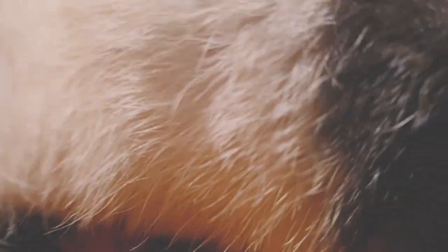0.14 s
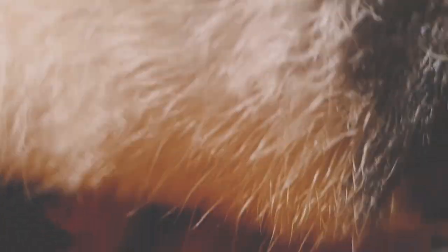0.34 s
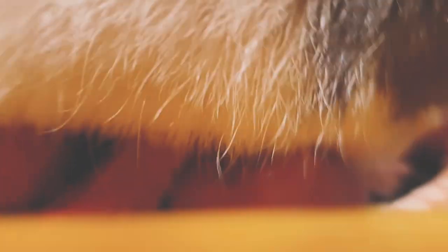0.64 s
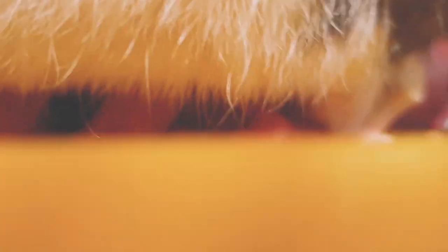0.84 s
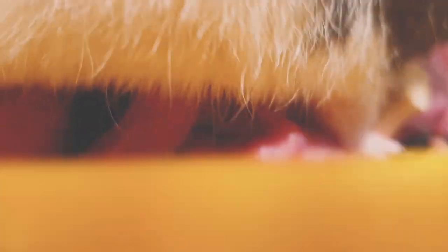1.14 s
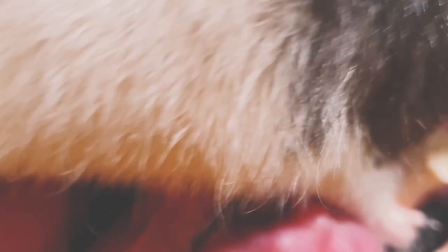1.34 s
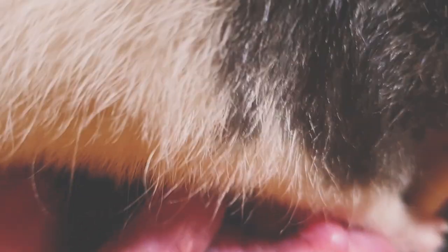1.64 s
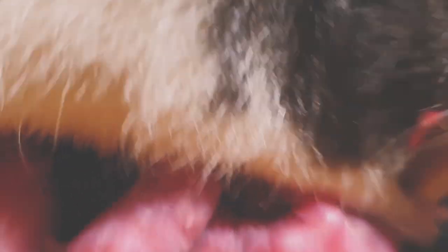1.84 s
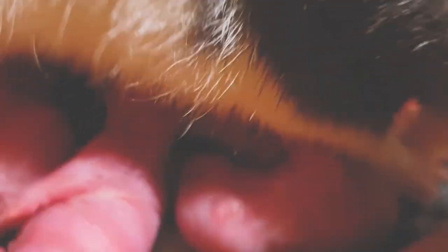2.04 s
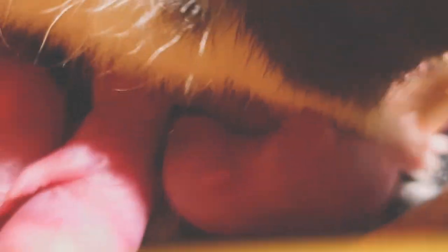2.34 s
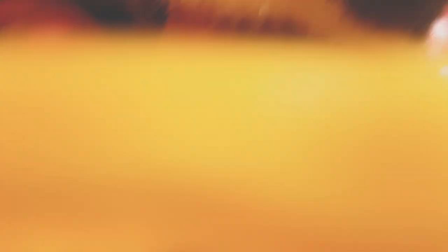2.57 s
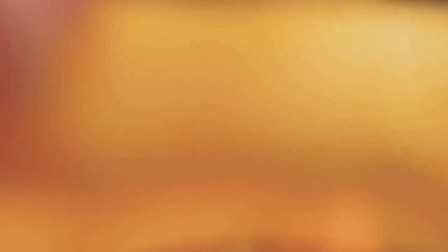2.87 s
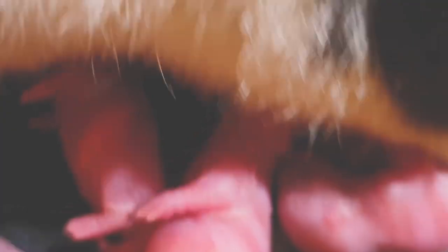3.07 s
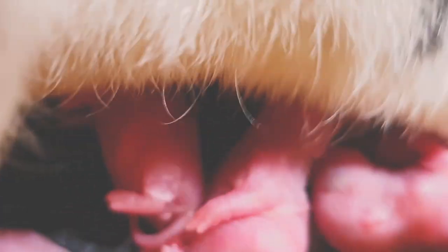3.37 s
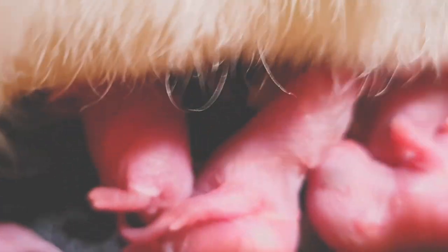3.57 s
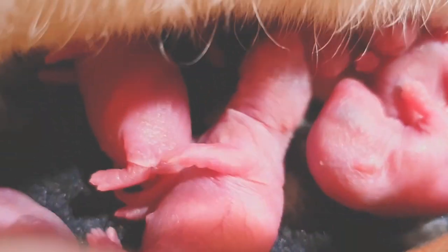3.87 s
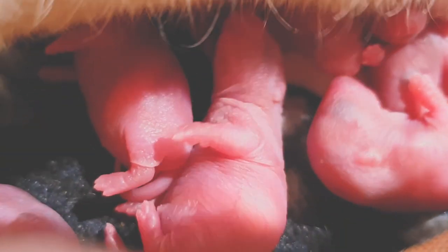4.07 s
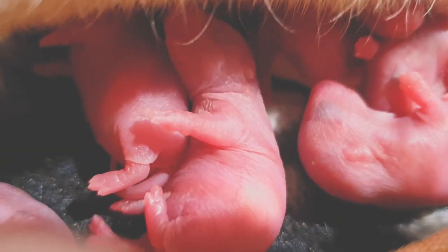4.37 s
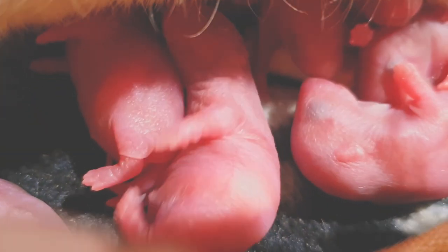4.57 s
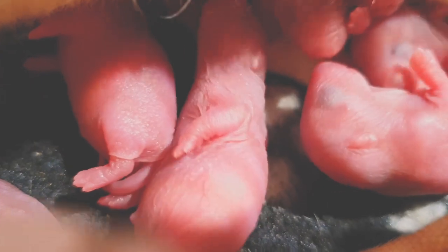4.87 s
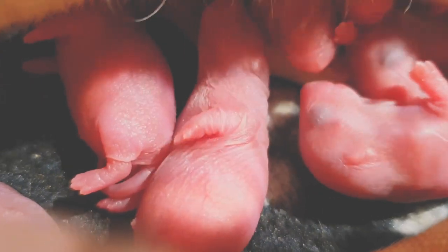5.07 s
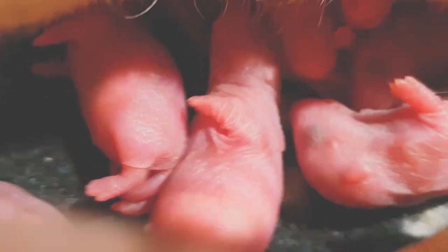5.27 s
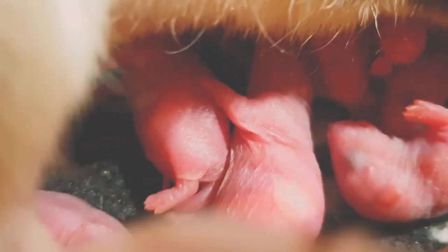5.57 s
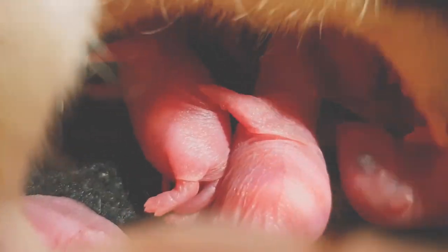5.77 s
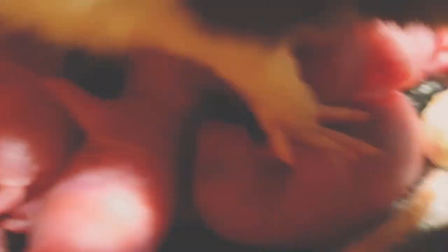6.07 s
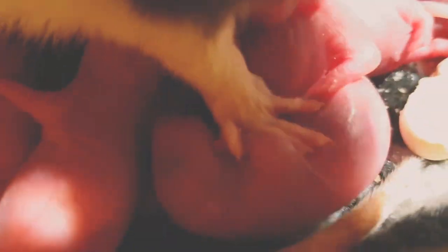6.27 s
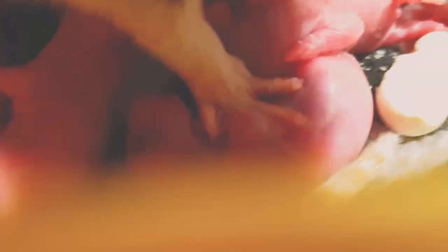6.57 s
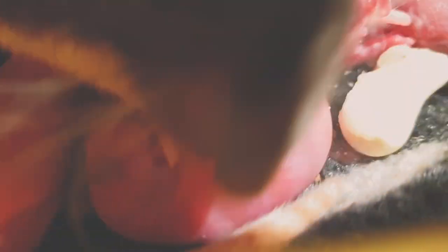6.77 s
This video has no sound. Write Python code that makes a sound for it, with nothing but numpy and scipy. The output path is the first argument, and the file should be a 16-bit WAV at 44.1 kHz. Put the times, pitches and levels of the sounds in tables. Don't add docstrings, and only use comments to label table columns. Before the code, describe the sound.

Newborn rat pups squeal in three ragged bouts of shrill, cracking whistles, with wet smacks, tiny clicks and fur rustling close to the microphone.

```python
import sys
import numpy as np
from scipy import signal
from scipy.fft import rfft, irfft, next_fast_len
from scipy.io import wavfile
from scipy.ndimage import uniform_filter1d

SR = 44100
rng = np.random.default_rng(int(sys.argv[2]) if len(sys.argv) > 2 else 0)


def dump_mix(stems):
    frames = np.atleast_2d(stems).T
    limited = np.clip(frames, -1, 1)
    pcm = np.round(limited * 32767).astype(np.int16)
    wavfile.write(sys.argv[1], SR, pcm)


def convert_level_to_amplitude(level_db):
    exponent = np.asarray(level_db, float) / 20
    return 10 ** exponent


N = 304731
TOP_HZ = 15750


def unit(x):
    return x / np.sqrt(np.mean(x ** 2) + 1e-20)


def along(points, hz):
    f, v = np.transpose(points)
    return np.interp(np.log(hz + 1), np.log(f + 1), v)


def curves(rows, t):
    s, *cols = np.transpose(rows)
    return [np.interp(t, s, c) for c in cols]


def wobble(rate, size):
    knots = size * rate / SR + 1
    values = rng.standard_normal(int(np.ceil(knots)))
    return np.interp(np.arange(size) * rate / SR, np.arange(knots), values)


def filtered(x, response):
    m = next_fast_len(x.shape[-1] + 4096)
    return irfft(rfft(x, m) * response(np.fft.rfftfreq(m, 1 / SR)), m)[..., :x.shape[-1]]


def modes(table):
    def response(f):
        total = 0
        for k, (centre, width, db) in enumerate(table):
            damping = 1j * f * width
            total = total + (-1) ** k * convert_level_to_amplitude(db) * damping / (centre * centre - f * f + damping + 1e-9)
        return total
    return response


def swells(rows, rest_db):
    t = np.arange(0, N + 128, 128) / SR
    s, length, *levels = np.transpose(rows)[..., None]
    rise_db = 479 * np.clip(s - t, 0, None)
    fade_db = 260 * np.clip(t - s - length, 0, None)
    held = [np.maximum((db - rise_db - fade_db).max(0), rest) for db, rest in zip(levels, rest_db)]
    return [np.interp(np.arange(N) / SR, t, db) for db in held]


# freq_hz, gain_db
RIGHT = [(300, -25), (1500, -11.5), (3200, -10), (5000, 0.5), (6500, -4.5), (10000, -15), (13000, -15),
         (16000, -16.5)]


def ports(x, right_db, lag_ms):
    def far(hz):
        late = np.exp(-(np.log((hz + 1) / 5600) / 0.35) ** 2)
        return -convert_level_to_amplitude(along(RIGHT, hz) + right_db) * np.exp(-2j * np.pi * hz * lag_ms / 1000 * late)
    return np.array([x, filtered(x, far)])


# centre_hz, width_hz, gain_db
HOLLOWS = [(2350, 260, -15), (3980, 230, -7), (8600, 450, -10)]


def hollow(hz):
    return convert_level_to_amplitude(sum(db * np.exp(-((hz - centre) / width) ** 2) for centre, width, db in HOLLOWS))


# freq_hz, correlation (-1 to 1)
ALIKE = [(60, 0.079), (200, -0.086), (600, -0.14), (1400, -0.45), (15000, -0.22)]
# freq_hz, difference_db
AIR_RIGHT = [(60, 13), (110, 10), (200, 5), (380, 5), (700, 9.5), (1290, 0.5), (2380, 1.5), (4400, -10.5),
             (8120, -4.5), (15000, 2.5)]


def pair(response):
    size = next_fast_len(N)
    hz = np.fft.rfftfreq(size, 1 / SR)
    turn = np.arccos(np.clip(along(ALIKE, hz), -1, 1)) / 2
    noise = rng.standard_normal((2, len(hz))) + 1j * rng.standard_normal((2, len(hz)))
    a, b = noise * [np.cos(turn), np.sin(turn)]
    lean = convert_level_to_amplitude(np.outer([.5, -.5], along(AIR_RIGHT, hz)))
    both = irfft(response(hz) * lean * [a + b, a - b], size)[:, :N]
    return both / np.std(both.mean(0))


# freq_hz, density_db (per Hz)
AIR = [(20, -38), (50, 7.5), (100, 0), (170, -18.5), (450, -24), (850, -19.5), (1300, -13), (2500, -18),
       (4500, -57), (7000, -47), (8700, -38), (12000, -21), (16000, -19)]
# freq_hz, level_db
HUM = [(49, -72), (98.4, -68.5), (491, -74), (590, -99.5)]


def room():
    t = np.arange(N) / SR
    hum = 0
    for hz, db in HUM:
        hum = hum + convert_level_to_amplitude(db + 4.35 * wobble(11, N)) * np.sin(2 * np.pi * hz * t + 1.12 * wobble(10, N))
    return convert_level_to_amplitude(-73.0) * pair(lambda hz: convert_level_to_amplitude(along(AIR, hz))) + hum * convert_level_to_amplitude([[2], [-3]])


# start_s, peak_db
SMACKS = [(0.0558, -62), (0.1446, -69), (0.2937, -62), (0.3267, -59.5), (0.402, -66), (0.4673, -62),
          (0.4893, -58), (0.6264, -55), (0.9326, -56), (1.0196, -62), (1.551, -48), (2.011, -61),
          (2.0257, -60), (2.535, -48), (2.811, -59), (3.0734, -60), (3.2116, -59), (3.2316, -53.5),
          (3.2578, -51.5), (3.3835, -63), (3.5039, -53.5), (3.5708, -51), (3.8408, -54), (3.9517, -54),
          (4.2438, -57), (4.2932, -52), (4.329, -49.5), (4.342, -54), (4.682, -61), (4.7085, -54),
          (4.8257, -61), (4.899, -66), (4.9116, -51.5), (5.1524, -58), (5.1802, -50), (5.293, -60),
          (5.735, -59), (5.7466, -55), (5.835, -64), (6.577, -33.5), (6.6608, -52), (6.7027, -60),
          (6.8034, -52), (6.876, -52)]
# centre_hz, width_hz, gain_db
MOUTH = [(1300, 640, 3)]
# centre_hz, width_hz, gain_db
SMACK_EDGE = [(5800, 2500, -22.5)]


def smacks():
    kicks = np.zeros(N)
    for s, db in SMACKS:
        kicks[round(s * SR)] += convert_level_to_amplitude(db + 30)
    return filtered(kicks, lambda hz: modes(MOUTH)(hz) ** 2 + modes(SMACK_EDGE)(hz) ** 2)


# start_s, peak_db
CLAWING = [(0.1465, -65.5), (0.2577, -67), (0.4895, -65.5), (5.966, -39), (1.604, -61), (1.867, -69),
           (2.0268, -55), (2.085, -60), (2.102, -68), (2.14, -60), (2.812, -73), (3.954, -65.5),
           (4.342, -64), (5.676, -54.5), (5.6901, -58), (5.8352, -60), (6.104, -56), (6.6387, -30),
           (6.6428, -32), (6.6775, -40.5)]
# start_s, peak_db
SUCKLING = [(0.6193, -55.5), (.8955, -50), (0.968, -49.5), (0.972, -57), (0.9916, -58), (1.5513, -49.5),
            (2.009, -51.5), (2.5752, -48.5), (3.349, -71), (3.436, -66.5), (3.536, -50), (3.571, -57),
            (3.664, -41), (3.6995, -54), (3.709, -51), (3.8002, -59), (4.3555, -57), (5.622, -56),
            (5.637, -52), (6.137, -46.5), (6.575, -43), (6.704, -46)]
# centre_hz, width_hz, gain_db
LIPS = [(1170, 700, 2.5), (3300, 2100, -1), (5990, 970, 0.5)]
# centre_hz, width_hz, gain_db
CLAW = [(8170, 1600, 2.5), (11500, 4100, 8), (14500, 3000, 11)]


def clicks():
    lips, claw = np.zeros((2, N + 200))
    t = np.arange(60) / SR
    for events, bright_db in [(SUCKLING, -13), (CLAWING, 1)]:
        for s, db in events:
            burst = rng.standard_normal(60) * convert_level_to_amplitude(-60 * t / 0.0025)
            burst[0] = 1.2
            burst /= np.linalg.norm(burst)
            span = slice(round(s * SR), round(s * SR) + 60)
            lips[span] += convert_level_to_amplitude(db + 24) * burst
            claw[span] += convert_level_to_amplitude(db + bright_db + 21.5) * burst
    return filtered(lips[:N], modes(LIPS)) + filtered(claw[:N], modes(CLAW))


def cage(x):
    t = np.arange(SR // 6) / SR
    tail = rng.standard_normal((2, len(t))) * convert_level_to_amplitude(-60 * t / 0.08)
    near, far = signal.fftconvolve(x[:1], tail / np.linalg.norm(tail[0]), axes=1)[:, :N]
    return np.array([convert_level_to_amplitude(-23.5) * near, convert_level_to_amplitude(-25.5) * filtered(far, lambda hz: convert_level_to_amplitude(along(RIGHT, hz)))])


# start_s, length_s, level_db
STIRS = [(.27, 0.38, -71.5), (.9, .05, -67), (.99, 0.027, -59.5), (1.85, 0.38, -69), (2.58, 0.061, -65.5),
         (3.68, 0.037, -66.5), (4.2, 0.14, -64), (4.36, 0.411, -67), (4.84, 0.091, -68), (5.3, 0.14, -72.5),
         (5.68, 0.32, -69), (6.04, 0.084, -55.5), (6.6, 0.18, -58), (6.8, 0.13, -49)]
# freq_hz, density_db (per Hz)
FUR = [(530, -46), (900, -14), (1310, -7.5), (1460, -10), (2690, -6), (7060, -8), (8760, -9.5),
       (12300, -8.5), (13700, -18.5), (16000, -2)]


def rustle():
    level_db = swells(STIRS, (-75,))[0]
    grain = convert_level_to_amplitude(level_db + 0.5 + 2.65 * wobble(180, N) + 2.4 * wobble(19, N))
    return grain * convert_level_to_amplitude([[2], [-2]]) * pair(lambda hz: hollow(hz) * convert_level_to_amplitude(along(FUR, hz)) * (hz > 800))


def breathed(pitch, first_db, rise, held_db, late_db, fall):
    s, hz = np.transpose(pitch)
    turns = [s[0], s[0] + rise, max(s[-1] - fall, s[0] + rise), s[-1]]
    t = np.union1d(s, turns)
    db = np.interp(t, turns, [first_db, held_db, late_db, late_db - 13])
    return np.transpose([t, np.interp(t, s, hz), db])


# freq_hz, gain_db
THROAT = [(900, -25), (1500, -8), (2000, -16), (2350, -8.5), (3200, -12), (4200, -6), (5100, -5.5),
          (6500, -5), (7700, -8.5), (8600, -8.5), (10000, -16), (12200, -13), (14000, -19), (16000, -22.5)]
# centre_s, width_s, lift_db
SURGES = [(.708, 0.0028, 4), (.741, .007, 2.5), (1.208, 0.0089, -2), (1.226, .008, 3.5),
          (1.258, .006, -4.5), (1.277, 0.0099, 2.5), (1.292, 0.0065, -3), (1.327, 0.0084, 2),
          (5.656, 0.0086, -3), (6.85, .02, 1.5), (1.66, 0.01, 3), (2.3, .03, -1), (2.445, 0.026, -1.5),
          (4.05, .02, 1.5), (4.16, 0.02, 1.5), (6.335, .015, 2), (6.52, .06, -0.5)]


def squeak(rows, states, low_db, high_db, chest_db, gap_db, top_gap_db, mid_gap_db, loss_db):
    t = np.arange(round(rows[0][0] * SR), round(rows[-1][0] * SR)) / SR
    size = len(t)

    def shade_db(hz):
        chest = chest_db * np.clip((2300 - hz) / 500, 0, 1)
        gap = gap_db * np.exp(-((hz - 2350) / 330) ** 2)
        return chest + gap + top_gap_db * np.exp(-((hz - 8400) / 650) ** 2)

    def colour(hz):
        mid_gap = mid_gap_db * np.exp(-((hz - 4200) / 450) ** 2)
        tilt = along([(3600, low_db), (5200, 0.0088), (7800, 0.0076), (9500, high_db)], hz)
        return hollow(hz) * convert_level_to_amplitude(shade_db(hz) + mid_gap + along(THROAT, hz) + tilt)

    hz, db = curves(rows, t)
    db = db + sum(lift_db * np.exp(-((t - s) / width) ** 2) for s, width, lift_db in SURGES)

    since, *state = np.transpose(states)
    now = np.clip(np.searchsorted(since, t) - 1, 0, None)
    half_db, chaos_db, shake = [uniform_filter1d(c[now] * 1., size=130) for c in state]
    chaos = np.clip(convert_level_to_amplitude(chaos_db), 0, 1)
    jitter = 0.0028 * wobble(58.4, size) + shake * chaos ** 1.225 * wobble(330, size)
    hz = uniform_filter1d(hz, size=200) * (1 + jitter)
    phase = np.pi * np.cumsum(hz) / SR

    k = np.arange(1, 27)[:, None]
    effort = convert_level_to_amplitude(0.22 * k * (db - db.max()) - loss_db * k)
    mouth = convert_level_to_amplitude(4 * np.clip(k / 8, 0, 1) * np.array([wobble(22, size) for _ in k]))
    gain = colour(k * hz / 2) * effort * mouth * (k * hz / 2 < TOP_HZ)
    whole, half = gain * (k % 2 == 0), gain * (k % 2 == 1)
    gate = convert_level_to_amplitude(half_db) * np.clip((half_db + 12.5) / 4, 0, 1)
    gain = whole / np.linalg.norm(whole, axis=0) + gate * half / np.linalg.norm(half, axis=0)
    waves = np.sin(k * phase + rng.uniform(0, 2 * np.pi, k.shape))
    tone = np.sum(gain * waves, 0) * np.sqrt(2 / (1 + gate ** 2))
    tone *= convert_level_to_amplitude(2.4 * chaos * wobble(298, size) + 0.4 * wobble(60, size))

    puffs = rng.standard_normal(size) * (1 + 0.5 * np.cos(phase)) * convert_level_to_amplitude(0.81 * wobble(252.4, size))
    rasp_db = [(1000, 8.4), (1500, 6.3), (6000, 3.4), (12000, 4.3)]
    rasp = unit(filtered(puffs, lambda f: colour(f) ** 1.05 * convert_level_to_amplitude(along(rasp_db, f))))
    broken = tone * np.tanh(3 * wobble(1100, size))
    near_tones = unit(filtered(broken, lambda f: hollow(f) * convert_level_to_amplitude(shade_db(f))))
    halo = 0.33
    rasp = np.sqrt(1 - halo) * rasp + np.sqrt(halo) * near_tones

    edge = np.clip(np.minimum(t - t[0], t[-1] - t) / 0.00053, 0, 1)
    steady = np.sqrt(np.clip(1 - 1.35 * chaos ** 2, 0, 1))
    return edge * convert_level_to_amplitude(db) * (steady * tone + 1.123 * chaos * rasp)


# time_s, pitch_hz
FIRST_BOUT = [
    [(0.66, 2288), (0.7, 3050), (0.749, 2950), (0.77, 2634), (0.792, 3124), (0.808, 2920), (0.826, 3076),
     (0.84, 2844), (0.897, 2690)],
    [(1.156, 2303), (1.2, 2947), (1.215, 3037), (1.242, 3260), (1.285, 3220), (1.312, 3285), (1.342, 2770),
     (1.36, 3030), (1.375, 2950)],
    [(1.376, 3340), (1.624, 3300)],
    [(1.627, 3477), (1.639, 3523), (1.661, 3381), (1.711, 3605), (1.735, 3420), (1.757, 3650),
     (1.771, 3900), (1.775, 4400), (1.815, 3980)],
    [(1.889, 4240), (1.896, 4280), (1.9, 3760), (1.93, 3540), (1.935, 3410), (1.947, 3470), (1.966, 3260),
     (1.977, 3810), (1.99, 3540)],
    [(2.191, 3485), (2.263, 3093), (2.295, 2972), (2.33, 3160), (2.359, 3220), (2.375, 2983), (2.381, 3110),
     (2.425, 3220), (2.447, 3500), (2.5, 3406), (2.535, 3436), (2.565, 3254), (2.586, 2870)],
    [(2.831, 3444), (2.851, 3020), (2.873, 3226), (2.903, 3034), (2.945, 3300), (2.953, 3428),
     (3.021, 3500), (3.033, 3906), (3.095, 3840)],
]
SECOND_BOUT = [
    [(3.453, 3180), (3.46, 3315), (3.475, 2977), (3.487, 3050), (3.53, 3000)],
    [(3.61, 1690), (3.618, 2147), (3.625, 2163), (3.631, 1863), (3.637, 1470), (3.645, 1287), (3.655, 1303),
     (3.667, 1200)],
    [(3.989, 2988), (4.104, 3158), (4.116, 3255), (4.144, 3000), (4.182, 3050), (4.188, 3486),
     (4.202, 3490), (4.214, 3300)],
    [(4.459, 3200), (4.53, 3037), (4.558, 3223), (4.584, 3010), (4.602, 2813), (4.632, 2865), (4.646, 3210),
     (4.668, 3120), (4.689, 3250)],
    [(4.931, 3675), (4.97, 3480), (5.0, 3610), (5.052, 3470), (5.072, 3245), (5.106, 3364), (5.13, 3560),
     (5.138, 3800), (5.165, 3800)],
]
THIRD_BOUT = [
    [(5.444, 3590), (5.464, 3254), (5.52, 3300)],
    [(5.5, 3230), (5.526, 3440), (5.564, 3515), (5.6, 3366), (5.622, 3390), (5.639, 3480), (5.644, 4040),
     (5.662, 3860)],
    [(5.866, 2932), (5.898, 2904), (5.942, 2967), (5.96, 3160), (5.968, 2454), (5.982, 3300), (6.021, 3570),
     (6.029, 3890), (6.047, 3600)],
    [(6.246, 1326), (6.27, 1340), (6.315, 2520), (6.34, 2886), (6.368, 3000), (6.394, 2657), (6.445, 2916),
     (6.47, 3265), (6.49, 3375), (6.54, 3344), (6.57, 3255), (6.6, 3250), (6.617, 3900)],
    [(6.738, 2570), (6.75, 2530), (6.759, 2654), (6.762, 2340), (6.78, 2300)],
    [(6.791, 3466), (6.808, 3370), (6.813, 3190), (6.826, 3200), (6.83, 3077), (6.865, 3364), (6.885, 3420),
     (6.915, 3380)],
]
# first_db, rise_s, held_db, late_db, fall_s
BREATHS = [(-45.5, 0.055, -32.5, -33, 0.075), (-47.5, 0.04, -33, -37.5, 0.038),
           (-53.5, 0.018, -50, -53.5, 0.0025), (-40.5, 0.11, -35, -39.5, 0.02),
           (-46, 0.046, -34, -37.5, 0.011), (-40.5, 0.026, -28, -32, 0.033), (-40, 0.04, -31, -40, 0.065),
           (-59.5, 0.028, -43.5, -57.5, 0.045), (-54, 0.012, -47, -49, 0.011),
           (-58.5, 0.04, -45, -42, 0.054), (-59, 0.04, -45, -48.5, 0.055), (-52, 0.026, -43.5, -46, 0.032),
           (-51, 0.031, -36, -45.5, 0.0079), (-57, 0.018, -42.5, -41, 0.035),
           (-41, 0.044, -31.5, -41, 0.018), (-47.5, 0.056, -31, -29.5, 0.05),
           (-36, 0.0096, -31, -34.5, 0.017), (-39, 0.061, -30.5, -33.5, .002)]
# low_db, high_db, right_port_db, port_lag_ms
PLACES = [(5, 12.5, -0.5, 0.14), (5.5, 12, 2, 0.13), (20.5, 15, 2.5, 0.052), (-2, 1, -0.5, 0.042),
          (-8.5, -5.5, -5.5, 0.016), (-8, -1.5, -6.5, 0.014), (-5.5, 1, 0.5, 0.052), (4.5, 18.5, 19, 0.04),
          (-1, 12, 20, 0.04), (16.5, 10.5, 2, 0.13), (12.5, 8, 0, 0.067), (10.5, 8.5, 0, 0.059),
          (0, 1, -8, 0.091), (5, 1, 1, 0.06), (-4.5, 7, -1, 0.046), (-5, 1, -6, 0.0053), (4, 3, -5, 0.021),
          (-5.5, 7.5, -6.5, 0.024)]
# chest_db (below 2 kHz), gap_db (2.4 kHz), top_gap_db (8.4 kHz)
SHADES = [(-3, 4, -13), (-4, 0, -16), (0, -2, 3), (0, 0, -1.5), (-1, -3, -6), (-2.5, 9, 2), (-7.5, -14, -5),
          (1.5, -7, -1), (5.5, 3, -26), (2, -9, 7), (4, -12, 10), (3, -29, 10.5), (1.5, -9.5, 3),
          (5, -5, -12), (7.5, 2, 1), (-3.5, 11, 3), (-4.5, 12, 5), (2.5, 24, 3)]
# mid_gap_db (4.2 kHz), loss_db (per overtone step)
MOUTHS = [(4, 0.2), (2.5, 0), (3.5, 0.5), (1.5, 0), (-2, 0), (1.5, 0), (0.5, 0.25), (-14, 0.2), (-3, 0.5),
          (1.5, 1), (6.5, 2), (3, 1.4), (3, 3), (1, 0), (3, -0.54), (-10.5, -0.4), (-10, 0.8), (-5, 0.3)]
# doubling_db, chaos_db, pitch_shake (0-1)
VOICES = dict(pure=(-30, -29, .1), clean=(-27, -24, .1), veiled=(-24, -14, .06), rough=(-20, -4, .02),
          harsh=(-22, -7, .09), breathy=(-18, -1, .1), faint=(-11, -28, .1), doubled=(-2, -20, .05),
          split=(-1, -10.5, .07), husky=(-1, -4, .12), forked=(1, -5, .11), broken=(2.5, -2, .12))
JUMPS = dict( faint=[1.93], pure=[1.773, 1.903, 1.962, 2.268, 2.497, 2.958, 5.521],
         clean=[4.64, 5.896, 1.632, 2.378, 2.837, 2.856, 2.875, 2.891, 2.7, 3.462, 5.052, 6.302, 6.88],
         harsh=[2.829, 2.849, 2.19, 2.223, 6.735, 6.797],
         veiled=[1.303, 2.868, 3.1, 2.896, .714, .745, .827, 1.885, 2.214, 3.6, 4.172, 4.995, 5.121, 6.023, 6.27, 5.497, 6.838],
         rough=[1.2, 1.745, 1.625, 1.897, 2.948, 3.505, 3.65, 4.55, 4.96, 6.771],
         breathy=[1.372, 2.574, 3.657, 5.152, 5.862, 6.24], doubled=[.79, 2.43, 5.995],
         split=[.766, 1.216, 1.262, 1.292, 1.662, 4.12, 5.035, 5.084, 5.975], husky=[1.378, 1.254, 1.283],
         forked=[5.44, .675, .736, .839, 1.695, 2.328, 2.394],
         broken=[1.15, .655, .87, 1.72, 3.45, 3.985, 4.2, 4.455, 4.668, 4.925, 5.958, 6.788])
# time_s, pitch_hz, level_db
WHEEZE = [
    (1.295, 3300, -58),
    (1.32, 3300, -50.5),
    (1.375, 3300, -53),
    (1.4, 3300, -57),
    (1.6, 3250, -57),
    (1.63, 3300, -53),
    (1.665, 3400, -55),
]
# time_s, pitch_hz, level_db
YELP = [
    (5.447, 5150, -43.5),
    (5.455, 5620, -31),
    (5.466, 4980, -40.5),
    (5.479, 3730, -41),
    (5.489, 2650, -34),
]
# time_s, pitch_hz, level_db
PEEP = [
    (6.845, 3400, -50),
    (6.86, 3470, -45),
    (6.873, 3880, -41),
    (6.882, 3930, -62),
]


def pups():
    out = np.zeros((2, N + SR))
    jumps = sorted((s, *VOICES[voice]) for voice, times in JUMPS.items() for s in times)
    lines = FIRST_BOUT + SECOND_BOUT + THIRD_BOUT
    cries = [(breathed(line, *breath), jumps, place, shade + mouth)
             for line, breath, place, shade, mouth in zip(lines, BREATHS, PLACES, SHADES, MOUTHS)]
    cries += [(WHEEZE, [(0, 1, -5, .08)], (22, 14, 2, .05), (2, -4, 0, 3, -1.0)),
              (YELP, [(0, -30, -9.5, 0.086)], (2.3, 2.3, 8.7, 0.018), (0, 0, 0, 0, 0)),
              (PEEP, [(0, -30, -6.0, 0.05)], (7, -5.0, -9, 4.5), (0, 0, 0, 0, 0))]
    for rows, states, (low_db, high_db, right_db, lag_ms), shade in cries:
        voice = np.pad(squeak(rows, states, low_db, high_db, *shade), (0, 512))
        cry = ports(voice, right_db, lag_ms)
        out[:, round(rows[0][0] * SR):][:, :cry.shape[1]] += cry
    return out[:, :N]


# start_s, peak_db, pitch_hz
TICKS = [
    (.968, -40, 4500),
    (3.006, -50, 6400),
    (2.011, -58, 7500),
    (5.735, -62, 5500),
    (6.556, -43, 2300),
    (6.579, -39, 2600),
    (6.6, -43, 2500),
]


def ticks():
    out = np.zeros(N)
    t = np.arange(600) / SR
    for s, db, hz in TICKS:
        out[round(s * SR):][:len(t)] += convert_level_to_amplitude(db - 60 * t / 0.011) * np.sin(2 * np.pi * hz * t)
    return out


# centre_hz, width_hz, gain_db
NEST = [(110, 70, -27), (311, 230, -4), (504, 188, 3.5), (752, 110, -2), (1100, 620, -8.5)]
# start_s, length_s, rub_db, bump_db
SHIFTS = [
    (1.5, 0.86, -74.5, -69),
    (2.5, 0.076, -60, -75),
    (2.915, 0.089, -54.5, -65.5),
    (3.61, 0.15, -66.5, -60.5),
    (5.33, 0.095, -67.5, -64),
    (5.88, 0.26, -55, -63.5),
    (6.2, .71, -68.5, -60.5),
    (6.36, 0.062, -58, -52),
    (6.59, 0.072, -61, -51.5),
]


def shifts():
    rub_db, bump_db = swells(SHIFTS, (-76.5, -73))
    rub = convert_level_to_amplitude(rub_db + 3 * wobble(55, N)) * pair(lambda hz: modes(NEST[1:])(hz) / (1 + (hz / 1800) ** 4))
    shared = 0.68
    late = filtered(rub[0], lambda hz: -1j + 0 * hz)
    rub[1] = np.sqrt(1 - shared ** 2) * rub[1] + shared * convert_level_to_amplitude(-7.0) * late
    bump = convert_level_to_amplitude(bump_db - 2.0 + 3.0 * wobble(19, N)) * pair(modes([(84, 62, -1.0), (148, 262, -8)]))
    return rub * convert_level_to_amplitude([[1.5], [-2]]) + bump


# start_s, peak_db
THUDS = [
    (3.734, -46.5),
    (6.441, -42.5),
    (6.578, -28),
    (6.5793, -39),
    (6.646, -57),
    (6.689, -65),
]


def knocks():
    kicks = np.zeros(N + 200)
    for s, db in THUDS:
        kicks[round(s * SR):][:60] += convert_level_to_amplitude(db + 7.0) * np.hanning(60)
    return filtered(kicks[:N], modes(NEST)) * convert_level_to_amplitude([[0], [-10]])


# time_s, pitch_hz, level_db
SCRAPE = [
    (6.25, 1327, -94),
    (6.29, 1328, -61),
    (6.55, 1324, -52),
    (6.75, 1300, -61),
    (6.81, 1300, -88),
]


def scrape():
    hz, db = curves(SCRAPE, np.arange(N) / SR)
    phase = 2 * np.pi * np.cumsum(hz * (1 + .06 * wobble(500, N))) / SR
    return convert_level_to_amplitude(db + 5.9 * wobble(64, N)) * np.sin(phase) * [[1], [.6]]


def scene():
    taps = ports(smacks() + clicks() + ticks(), right_db=1.5, lag_ms=0.059)
    near = taps + pups() + knocks()
    mother = rustle() + shifts() + scrape()
    return room() + near + cage(near) + mother


def low_pass(x):
    return signal.sosfilt(signal.butter(12, 17120, fs=SR, output="sos"), x)


def record(dry):
    return low_pass(filtered(dry, lambda hz: hz < TOP_HZ))


dry = scene()
out = record(dry)
dump_mix(out)
```